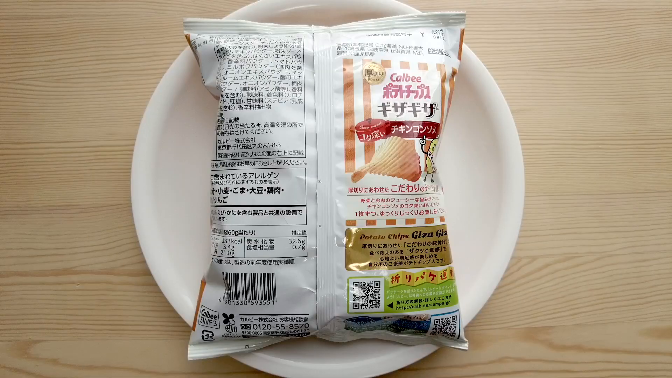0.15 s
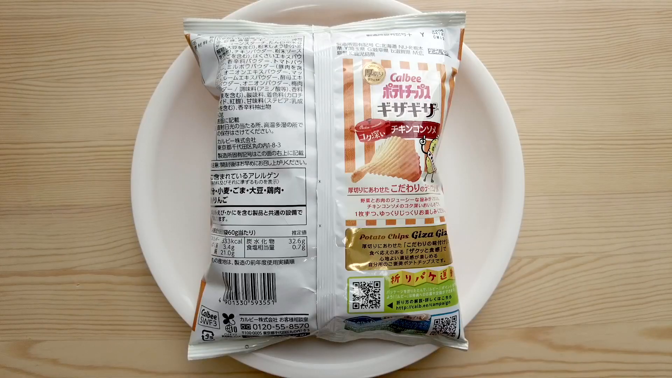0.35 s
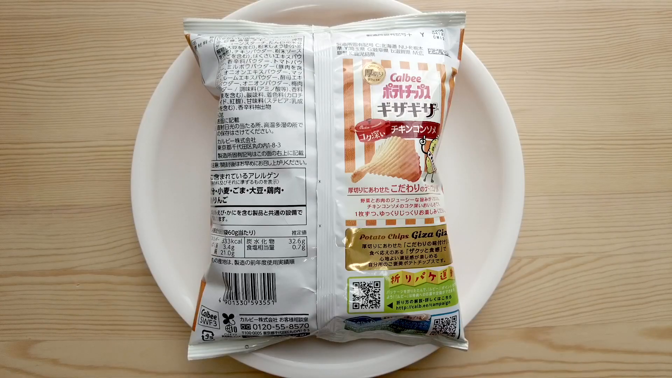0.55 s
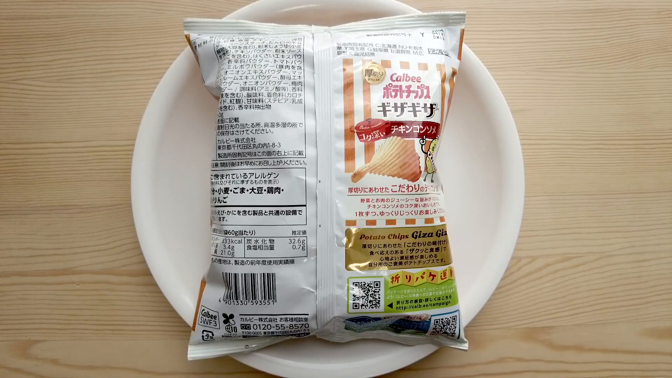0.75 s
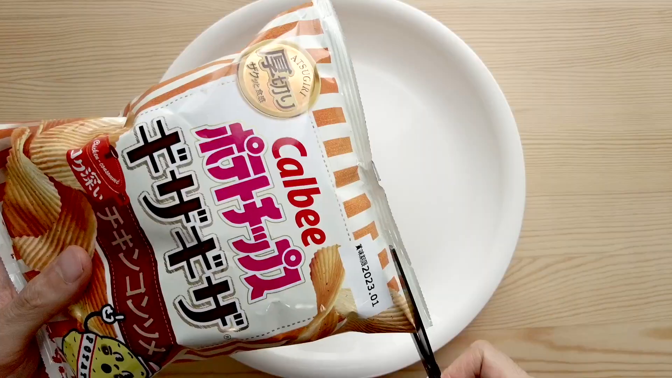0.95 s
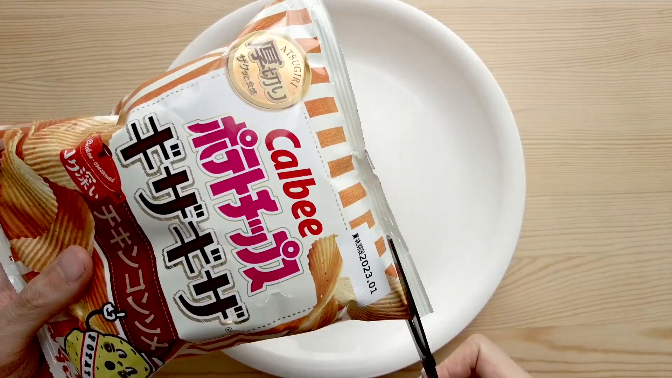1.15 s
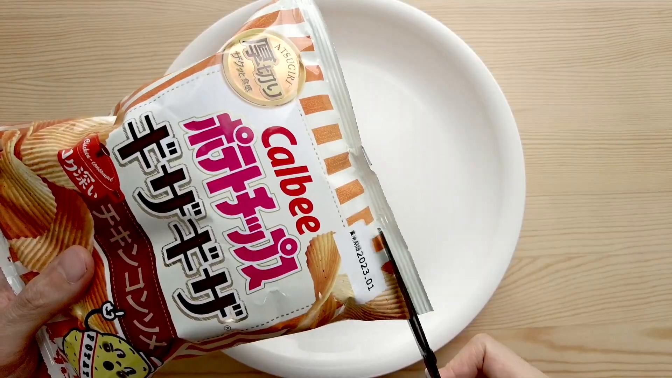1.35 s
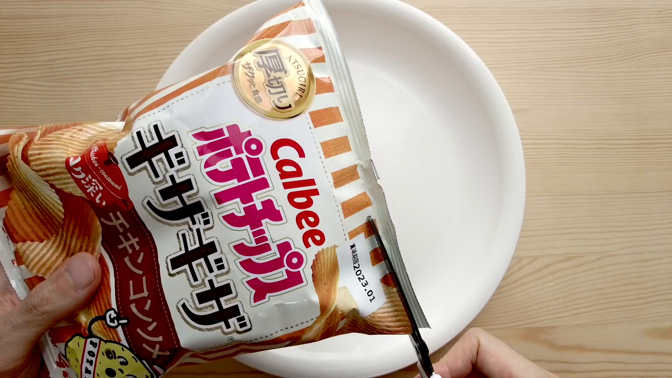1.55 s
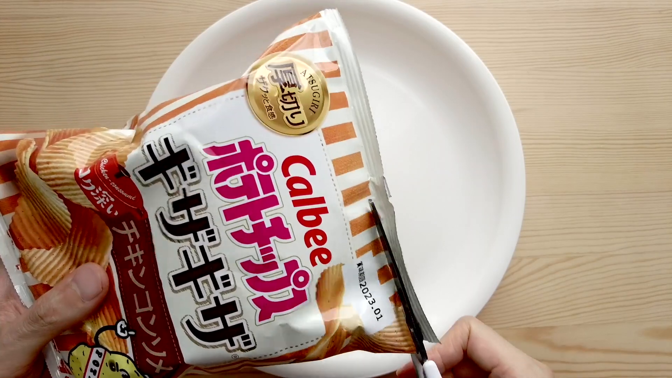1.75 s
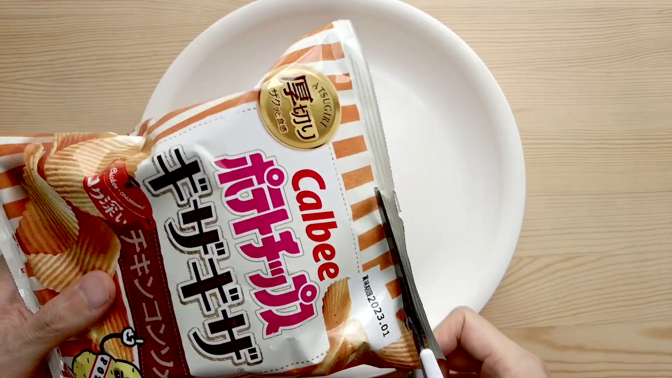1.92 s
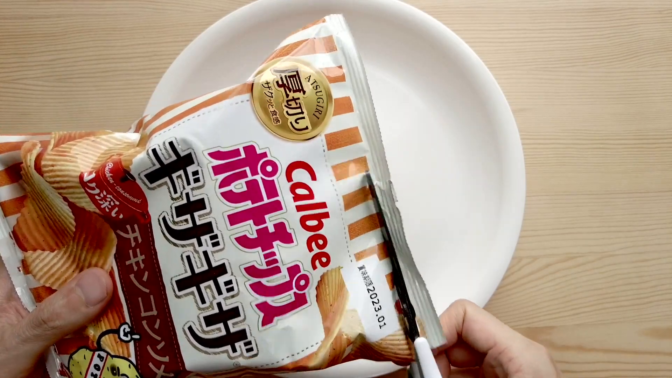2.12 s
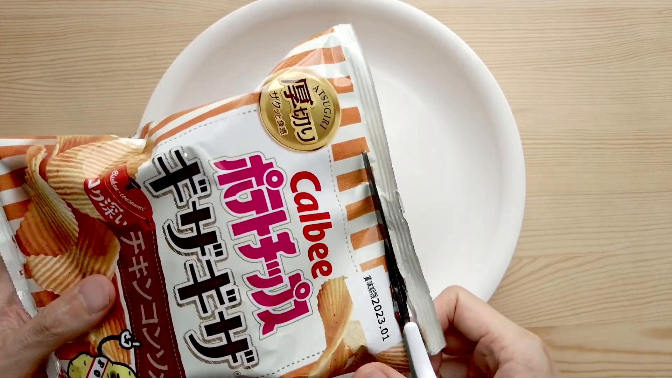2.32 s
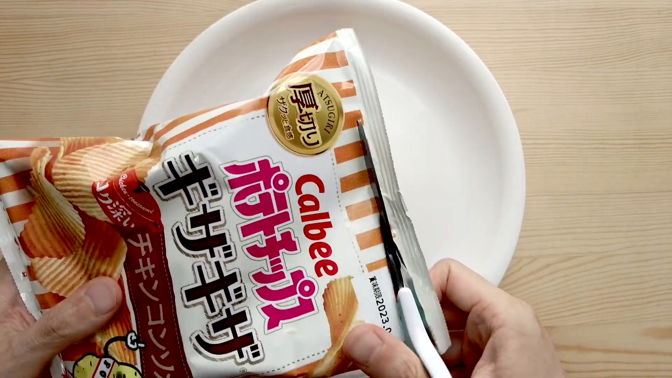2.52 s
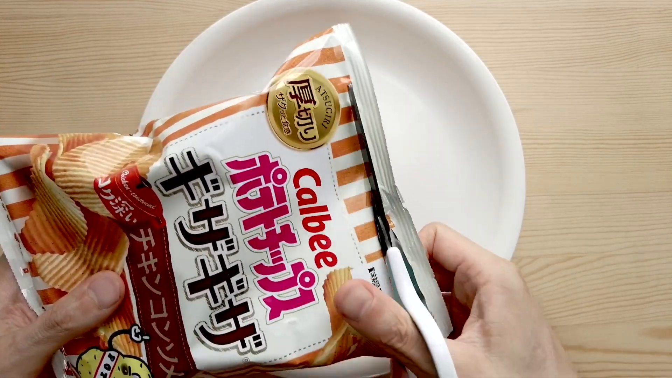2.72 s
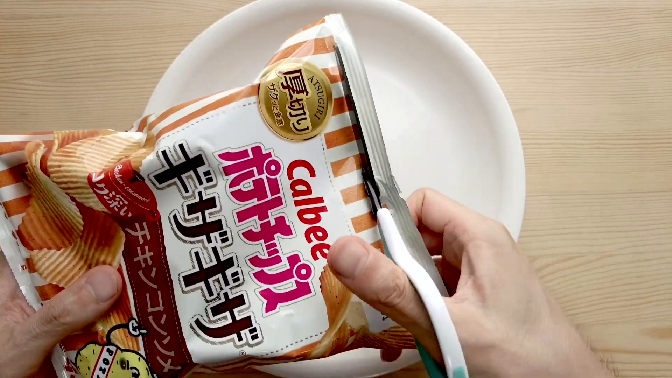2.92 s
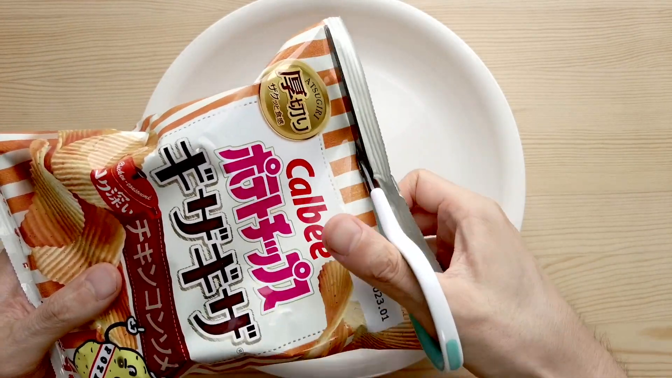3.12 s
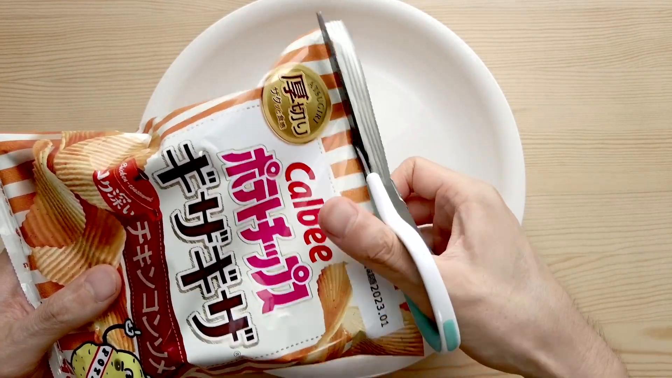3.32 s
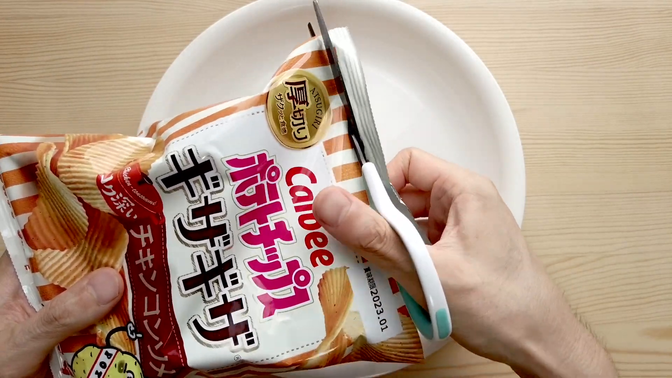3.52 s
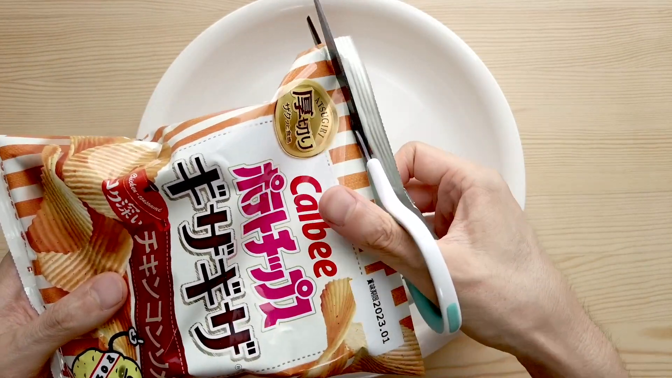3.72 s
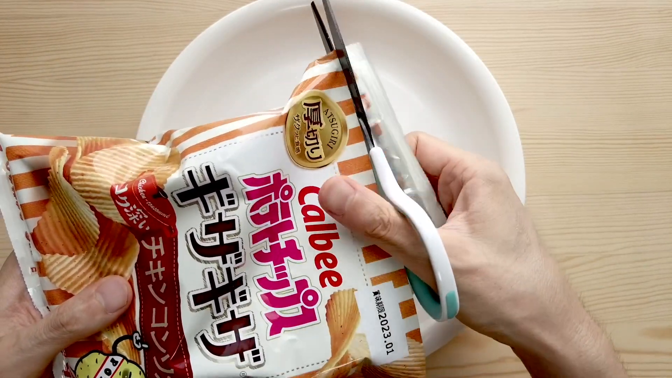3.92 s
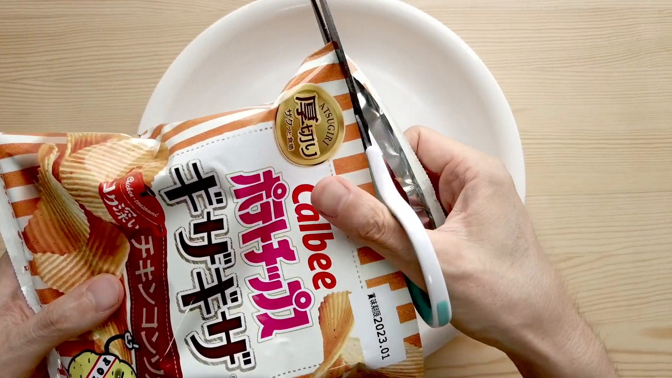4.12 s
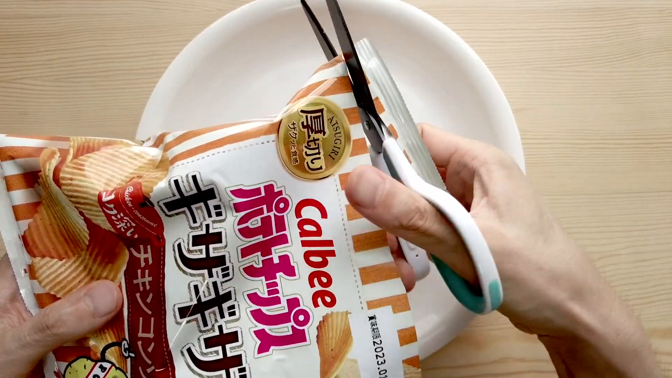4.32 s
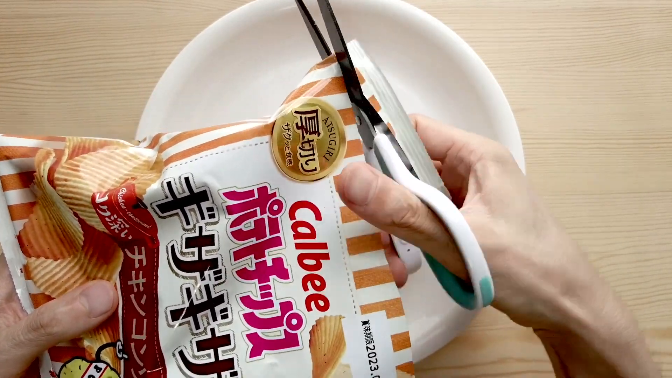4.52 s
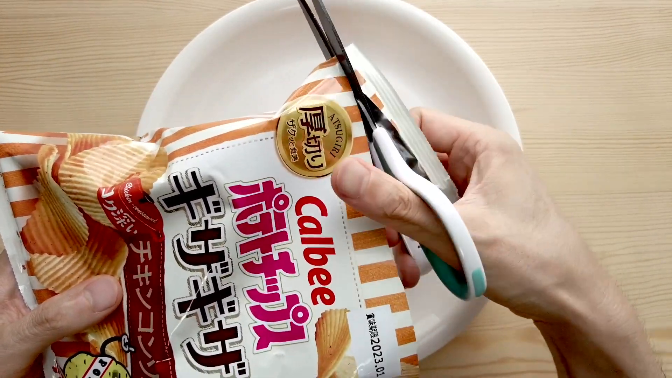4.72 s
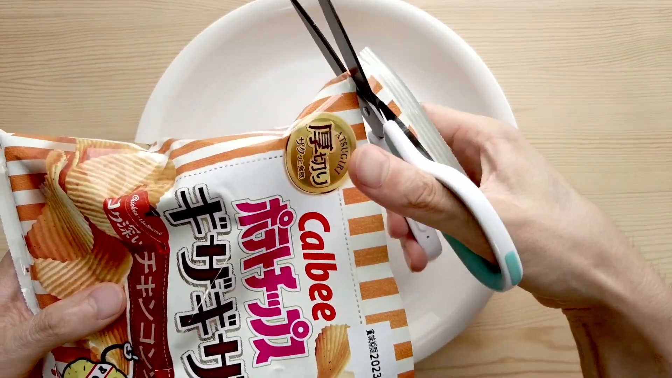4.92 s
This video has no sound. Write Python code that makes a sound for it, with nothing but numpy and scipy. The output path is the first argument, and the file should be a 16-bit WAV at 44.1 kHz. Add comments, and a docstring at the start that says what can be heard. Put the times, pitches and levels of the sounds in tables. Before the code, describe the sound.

For the first second there is almost only a quiet room: low, slightly wavering rumble under soft hiss, with barely audible foil stirrings near 1 s. At about 1.2 s scissors bite into a foil-lined snack bag and crisp crackling begins abruptly. Sharp, dry snaps ride on grainy rustle that swells and fades around eight times a second, strongest from 1.2 to 2.6 s, with prominent cracks near 1.57, 1.78 and 2.5 s. Small hollow pops of the air-filled bag and brief, faint, rising blade hisses appear between them, the hisses only until 2.8 s. From 3 to 4 s the crinkles continue regularly, somewhat lighter. After 4 s they become sparse and soft, with a clearer snap near 4.66 s and a last small crackle around 5 s. Close stereo phone microphone, bag slightly left of centre, very short faint echo.

```python
"""A quiet room hums and hisses first; then foil rustles and snaps in quick swells, about eight a second.
Scissors work along the edge of a foil-lined snack bag held over a plate, close under a phone.
Each swell of rustle is made of noise grains, the tiny creases. Single creases snap as short noise bursts
that ring the air-filled bag. Folds pop as brief pitched noise, and the sliding blades add a thin
climbing hiss. A short echo and the steady room noise lie underneath."""
import sys
import numpy as np
from scipy import signal
from scipy.fft import rfft, irfft, next_fast_len
from scipy.io import wavfile

SR = 44100
rng = np.random.default_rng(int(sys.argv[2]) if len(sys.argv) > 2 else 0)


def inscribe(sig):
    """Save sig as 16-bit PCM at rate SR to the path in sys.argv[1].

    A 1-D sig is mono; a 2-D sig holds one channel per row.
    Samples are clipped to [-1, 1] before scaling.
    """
    pcm = np.round(np.clip(np.atleast_2d(sig).T, -1, 1) * 32767)
    wavfile.write(sys.argv[1], SR, pcm.astype(np.int16))


N = 222969  # length in samples


def undb(db):
    """Turn decibels into a gain."""
    return 10 ** (np.asarray(db) / 20)


def unit(x):
    """Scale to rms 1 along time, both channels together."""
    return x / np.sqrt(np.mean(x ** 2, axis=(-2, -1), keepdims=True))


def blend(mid, side, alike):
    """Mix a common and an opposed sound into left and right; alike 1 makes both ears the same."""
    alike = np.clip(alike, 0, 1)
    ears = [np.sqrt(1 + alike) * mid + sign * np.sqrt(1 - alike) * side for sign in (1, -1)]
    return np.stack(ears, axis=-2)


def pair(shape, alike):
    """Make left and right noise with the given likeness."""
    mid, side = rng.standard_normal((2,) + shape)
    return blend(mid, side, alike)


def band(x, lo_hz, hi_hz, order=3):
    """Keep one range of pitch."""
    return signal.sosfilt(signal.butter(order, [lo_hz, hi_hz], "band", fs=SR, output="sos"), x)


def peak(hz, centre_hz, width_hz):
    """Response of one resonance: strongest at its centre, weaker to both sides."""
    return 1j * hz * width_hz / (centre_hz ** 2 - hz * hz + 1j * hz * width_hz)


# colour of the room noise, before its overall level is set: (f/Hz, level/dB for each Hz)
ROOM_COLOUR = [(12, -37), (20, -8), (43, -4), (75, -13.5), (108, -14), (169, -22), (244, -21), (281, -26),
               (521, -31.5), (616, -27.5), (772, -29.5), (1120, -32), (1300, -28), (1800, -33),
               (4050, -44.5), (15200, -57), (16500, -80)]
# how alike the room sounds at both ears: (f/Hz, likeness, 1 = the same)
ROOM_LIKENESS = [(60, .98), (130, 0.99), (290, 0.78), (640, 0.077), (1400, 0.67), (3100, 0.36),
                 (6800, 0.016)]
ROOM_DB = -56.5  # rms level of the whole room noise


def room(waver_db=3.0, waver_hz=4.6, rumble_hz=70.4):
    """Steady hiss over a rumble that wavers; the bass is nearly the same left and right."""
    size = next_fast_len(N)
    log_hz = np.log(np.arange(size // 2 + 1) * SR / size + 1)

    def along(rows):
        """Read a table at every pitch, on a log pitch scale."""
        hz, value = np.array(rows).T
        return np.interp(log_hz, np.log(hz), value)

    mid, side = rfft(rng.standard_normal((2, size)))
    ears = blend(mid, side, along(ROOM_LIKENESS))
    hush = irfft(ears * undb(along(ROOM_COLOUR)), size)[:, :N]
    waver = unit(band(rng.standard_normal((1, N)), waver_hz / 4, waver_hz, order=1))
    rumble = signal.sosfiltfilt(signal.butter(2, rumble_hz, fs=SR, output="sos"), hush)
    wavering = hush + rumble * (undb(waver_db * waver) - 1)
    return unit(wavering) * undb(ROOM_DB)


def walls(x, wet_db=-22, t60_s=0.23, gap_ms=3.5):
    """Short dull echo of table and walls: fading noise, different at each ear."""
    t = np.arange(SR // 3) / SR
    tail = band(rng.standard_normal((2, len(t))), 120, 14400)
    tail = tail * undb(-60 * t / t60_s) * (t > gap_ms / 1000)
    tail = tail / np.sqrt(np.sum(tail ** 2, axis=1, keepdims=True))
    centre = x.mean(axis=0, keepdims=True)
    return undb(wet_db) * signal.fftconvolve(centre, tail, axes=1)[:, :N]


# slides of the blades: (start t/s, end t/s, starting f/Hz, level/dB)
BLADE_SLIDES = [(1.262, 1.36, 9800, -55.5), (1.533, 1.568, 9200, -51), (1.796, 1.861, 9350, -52),
                (2.279, 2.33, 9100, -54.5), (2.736, 2.76, 8500, -60)]
SLIDE_CLIMB_HZ = 1442  # how far each slide climbs


def slides(width_hz=900, alike=.5):
    """Narrow noise whose centre climbs while the blades close."""
    out = np.zeros((2, N))
    slow = signal.butter(2, width_hz / 2, fs=SR, output="sos")
    for start, end, hz, db in BLADE_SLIDES:
        i = np.arange(int(start * SR), int(end * SR))
        centre_hz = np.linspace(hz, hz + SLIDE_CLIMB_HZ, len(i))
        turn = 2 * np.pi * np.cumsum(centre_hz) / SR
        # slow noise on a cosine and a sine gives a narrow hiss around the moving pitch
        a, b = (signal.sosfilt(slow, pair((len(i),), alike)) for _ in range(2))
        hiss = unit(a * np.cos(turn) + b * np.sin(turn))
        out[:, i] += hiss * np.sqrt(np.hanning(len(i))) * undb(db)
    return out


# hollow pops as a fold of the air-filled bag gives way: (centre t/s, f/Hz, level/dB)
FOLD_POPS = [(1.311, 195, -55), (1.406, 329, -44), (1.661, 833, -63.5), (1.785, 389, -49.5),
             (2.169, 173, -62), (2.264, 770, -48.5), (2.329, 690, -60), (2.377, 185, -61),
             (2.501, 417, -53.5), (2.77, 1060, -56.5), (3.479, 182, -59.5), (3.568, 414, -61),
             (3.961, 178.6, -61.5), (4.133, 947, -61), (4.237, 189, -62.5), (4.244, 650, -60),
             (4.733, 825, -57), (4.814, 680, -60), (5.042, 438, -57.5)]
FOLD_MS, FOLD_LAW = 21, .6  # half-length of a 200 Hz pop; higher pops are shorter by this power of pitch


def pops(width=0.69, alike=0.85):
    """Each pop is a few uneven swings round one pitch, swelling and dying."""
    out = np.zeros((2, N))
    for s, hz, db in FOLD_POPS:
        half = int(FOLD_MS * (200 / hz) ** FOLD_LAW * SR / 1000)
        centre = int(s * SR)
        i = np.arange(centre - half, min(centre + half, N))
        noise = pair((3 * half,), alike)
        # keep only the end, after the filter has had time to start
        swing = band(noise, hz * (1 - width / 2), hz * (1 + width / 2))[:, -len(i):]
        swing = swing * np.hanning(2 * half)[:len(i)]
        out[:, i] += swing / np.sqrt(np.mean(swing ** 2, axis=1, keepdims=True)) * undb(db)
    return out


# swells of rustle:
# (peak t/s, rise t/ms, fall t/ms, foil rustle level/dB, bag body minus foil level/dB)
RUSTLE_SWELLS = [(.95, 10, 13, -77.5, -8), (1.05, 13, 9.2, -77, -5), (1.24, 24, 5, -59, -20.5),
                 (1.251, 4, 130, -59, 2.5), (1.398, 5, 60, -64.5, 6), (1.537, 22, 9, -54, 4),
                 (1.559, 6, 50, -59, 8.5), (1.67, 25, 49, -62, 7.5), (1.824, 42, 39, -54.5, 1),
                 (1.916, 33, 95, -65, 1), (2.064, 47, 38, -50, 1), (2.175, 28, 46, -63, 8),
                 (2.304, 47, 28, -57.5, 4), (2.401, 32, 36, -58.5, 2.5), (2.53, 25, 32, -48, 3.5),
                 (2.651, 37, 27, -59.5, 0.5), (2.769, 35, 35, -61.5, 0.5), (2.866, 19, 43, -64, 5),
                 (2.904, 8, 29, -58.5, 3.5), (3.01, 27, 25, -64, 3), (3.101, 7, 19, -62, 2),
                 (3.132, 7.7, 22, -59, -1.5), (3.26, 28, 26, -56, 6), (3.349, 32, 48, -63.5, 3.5),
                 (3.475, 27, 22, -54.5, 3), (3.571, 21, 31, -66, -4), (3.667, 15, 31, -64, 4),
                 (3.791, 21, 22, -57, 2), (3.888, 23, 21, -55.5, 0), (3.967, 41, 13, -64, 2),
                 (4.154, 74, 21, -75, 6), (4.243, 23, 21, -65.5, 5), (4.287, 18, 22, -75.5, 16.5),
                 (4.392, 63, 82, -76, 3.5), (4.577, 42, 19, -68, 10), (4.661, 16, 28, -62.5, 2),
                 (4.794, 31, 21, -71.5, 7.5), (4.897, 23, 39, -73.5, 6), (4.983, 12, 30, -62.5, 8),
                 (5.044, 17, 18, -71.5, 11)]
# treble of the rustle as time goes on: (t/s, treble minus foil level/dB)
RUSTLE_TREBLE = [(1.2, -2), (2, -6), (2.5, -3.5), (3, -1), (3.8, -2), (4.3, -3.5), (5, -1)]
SETTLE_DB, SETTLE_MS = -17, 63  # after a swell the foil goes on settling faintly


def swells(steep=2.57):
    """Power of the rustle in body, foil and treble: it swells and fades again and again."""
    ms = np.arange(N) * 1000 / SR
    power = np.zeros((3, N))
    for s, rise_ms, fall_ms, foil_db, body_db in RUSTLE_SWELLS:
        age = ms - s * 1000
        swell = np.exp(-2 * np.abs(age / np.where(age < 0, rise_ms, fall_ms)) ** steep)
        # these curves are power, so decibels count double in undb
        settling = undb(2 * SETTLE_DB) * np.exp(-2 * np.abs(age) / SETTLE_MS) * (age > 0)
        treble_db = np.interp(s, *np.transpose(RUSTLE_TREBLE))
        level_db = foil_db + np.array([[body_db], [0], [treble_db]])
        power += np.maximum(swell, settling) * undb(2 * level_db)
    return power


# resonances of bag and plate: (f/Hz, width f/Hz, level/dB)
BAG_RESONANCES = [(228, 131, -0.5), (752, 370, 1.5), (1067, 412, 4), (1694, 990, -2), (3052, 343, 0),
                  (4820, 1680, -6), (8510, 540, -7), (9670, 1500, -10.5), (14550, 3200, -13.5)]


def ring(x, stretch=0.96, own_hz=None, own_db=0., own_width=.2):
    """Ring the bag's resonances, shifted by stretch as folds change, plus any struck panel's own pitch."""
    size = next_fast_len(x.shape[-1])
    hz = np.arange(size // 2 + 1) * SR / size
    gain = 0
    for k, (f, width, db) in enumerate(BAG_RESONANCES):
        # neighbours swing in opposite directions
        gain = gain + (-1) ** k * undb(db) * peak(hz / stretch, f, width)
    if own_hz is not None:
        gain = gain * (1 + undb(own_db) * peak(hz, own_hz, own_width * own_hz))
    return irfft(rfft(x, size) * gain, size)[..., :x.shape[-1]]


def creases(per_s, spread_db, smear_ms):
    """Loudness of a crowd of tiny creases: random moments, a few much larger than the rest; rms 1."""
    hits = (rng.random(N) < per_s / SR) * undb(spread_db * rng.exponential(size=N))
    grain = signal.lfilter([1], [1, -np.exp(-1000 / SR / smear_ms)], hits)
    return grain / np.sqrt(np.mean(grain ** 2))


# rustle bands, two each for body, foil and treble:
# (low f/Hz, high f/Hz, level/dB against the swell, left-right likeness)
FOIL_BANDS = [(114, 620, -4, 0.78), (515, 2700, 2.5, 0.79), (2392, 4200, -1, 0.52), (3820, 7660, -1, 0.21),
              (5640, 9100, -1, 0.51), (9000, 21300, 2, 0.17)]


def rustle(power, bed=1.0, shared=0.63):
    """A swelling carpet of creases; some sound in all bands, others in one, so grains differ in colour."""
    common = creases(per_s=700., spread_db=2.0, smear_ms=.9)
    out = 0
    for k, (lo, hi, db, alike) in enumerate(FOIL_BANDS):
        # duller bands come from larger folds: fewer and longer grains
        scale = (3000 / hi) ** 0.34
        own = creases(per_s=500. / scale, spread_db=2.2, smear_ms=1.5 * scale)
        grain = bed + shared * common + own
        ringing = ring(pair((N,), alike) * grain)
        out = out + unit(band(ringing, lo, hi)) * undb(db) * np.sqrt(power[k // 2])
    return out


SNAP_BODY_HZ, SNAP_MIDDLE_HZ = 980, 2210  # usual pitches where the panel's own lies in the other range
TICKS = 40  # number of small snaps left to chance
TICK_DB, TICK_SPREAD_DB = 1.5, 3  # their level over the rustle, and its scatter


def ticks(power, colour_db=2.5, crowd=.25):
    """Small snaps gather where the rustle swells, about as loud as it is, each with a colour of its own."""
    odds = np.cumsum(power[1] ** crowd)
    chance = rng.standard_normal((TICKS, 4)).T
    at = np.searchsorted(odds, odds[-1] * rng.random(TICKS))
    db = 10 * np.log10(power[1, at]) + TICK_DB + TICK_SPREAD_DB * chance[0]
    panel_hz = SNAP_MIDDLE_HZ * np.exp(0.14 * chance[3])
    return np.transpose([at / SR, db, colour_db * chance[1], colour_db * chance[2], panel_hz])


BODY_TOP_HZ, TREBLE_HZ = 1500, 5000  # borders between body, middle and treble
SNAP_DIE_MS, SNAP_DULLING = 1.74, 0.14  # basic dying time; dB longer for each dB of body over treble
SNAP_SHARPENING, SNAP_USUAL_DB = .15, -45  # dying time dB shorter for each dB above the usual level
SNAP_PUSH_DB, SNAP_PUSH_MS = 15, .035  # the first one-sided push over the burst, and its dying time
# the clear snaps: (t/s, middle level/dB, bag body minus middle level/dB,
# treble minus middle level/dB, snapping panel f/Hz)
CLEAR_SNAPS = [(1.2229, -38, 2, 1, 730), (1.2535, -35, 0, -6, 4320), (1.2595, -39, 1, -6, 1410),
               (1.3052, -55, 9, -9, 330), (1.3386, -50, 2, -6, 680), (1.3891, -54, -3, 11, 1510),
               (1.4008, -39, 3, -12, 1000), (1.5165, -43, -3, 3, 3730), (1.5274, -36, -3, 2, 1780),
               (1.536, -41, -2, 2, 3530), (1.5655, -29, -5, -4, 2000), (1.5703, -40, 0, 1, 1830),
               (1.6011, -40, 2, -2, 970), (1.6456, -57, 5, 0, 1080), (1.6809, -35, -8, -6, 2780),
               (1.6884, -47, -2, -12, 1840), (1.7205, -59, 14, -11, 600), (1.7306, -53, -9, -3, 3030),
               (1.78, -33, -5, -6, 3130), (1.8303, -49, -2, -3, 3100), (1.841, -40, -2, -8, 3060),
               (1.9009, -59, -3, 11, 3010), (1.9073, -56, 15, -10, 730), (2.0078, -53, 4, -25, 1290),
               (2.0203, -42, -7, -11, 1820), (2.032, -36, 3, -3, 1070), (2.0588, -40, -1, -2, 2910),
               (2.064, -34, -7, -9, 2840), (2.1591, -52, 0, -5, 1670), (2.242, -44, -8, -4, 1740),
               (2.2765, -52, 12, -9, 730), (2.3024, -45, -2, 3, 3180), (2.3747, -51, 5, -10, 970),
               (2.4158, -47, -3, -13, 2970), (2.5035, -31, -6, -5, 3300), (2.55, -39, -2, -5, 2290),
               (2.613, -54, 2, -2, 800), (2.6522, -38, -9, -6, 2940), (2.7273, -60, -3, 5, 4610),
               (2.7786, -46, 0, -10, 2190), (2.7847, -52, 4, 1, 3230), (2.8157, -64, -5, 3, 3030),
               (2.8632, -48, -5, 4, 4790), (2.8991, -55, 11, -14, 1130), (2.911, -42, -1, -10, 1690),
               (2.9964, -56, -13, -5, 2670), (3.0182, -36, -3, -1, 2220), (3.0971, -50, -2, 1, 4400),
               (3.1327, -42, 2, -4, 1250), (3.2422, -43, 1, -3, 1510), (3.2463, -47, 2, -1, 990),
               (3.2718, -47, 0, -6, 2620), (3.3247, -59, -2, 3, 2930), (3.4738, -39, -4, -4, 2110),
               (3.5661, -37, 3, -11, 760), (3.5875, -58, -9, 7, 4310), (3.6705, -58, 3, 4, 660),
               (3.7824, -51, -8, -4, 3060), (3.7941, -44, -4, 2, 4940), (3.8687, -52, 3, 3, 550),
               (3.9032, -55, -7, 3, 2930), (3.9603, -53, 5, -1, 750), (4.0021, -57, -8, 8, 4490),
               (4.165, -62, -17, -9, 3430), (4.2319, -56, 0, 7, 4600), (4.274, -64, -2, -3, 4020),
               (4.285, -54, -1, -22, 1650), (4.385, -69, -2, 6, 4500), (4.4116, -64, -2, -6, 3000),
               (4.4451, -65, 2, 2, 2220), (4.5098, -60, -11, -15, 1660), (4.5441, -66, 9, 6, 410),
               (4.5564, -49, -1, -17, 1540), (4.576, -53, 1, 4, 4450), (4.658, -40, -9, -2, 2760),
               (4.7715, -64, 5, -3, 1410), (4.7834, -62, 3, 2, 970), (4.9746, -51, 3, -3, 610),
               (4.985, -46, -9, -15, 2930)]
# The next five tables each list (body, middle, treble).
# left-right likeness (1 = the same)
SNAP_LIKENESS = [.85, .83, .52]
# dying time as a multiple of the snap's own
SNAP_LENGTHS = [1.7, 1.05, .7]
# flutter after the burst (level/dB)
SNAP_FLUTTER_DB = [-13, -11, -9]
# how far the snapping panel's own pitch stands out (level/dB)
PANEL_PITCH_DB = [7, 3, 3]
# delay of each range, so that body, middle and treble of a snap sound together (t/ms)
SNAP_DELAY_MS = [0, .4, .5]


def snaps(rows, tail=3.0, rise_ms=0.036, shift=0.096):
    """Each crease lets go with a spike, a burst and weaker flutter; the body rings longer than the treble."""
    s, mid_db, body_db, treble_db, panel_hz = rows.T[:, :, None, None]
    dulling_db = SNAP_DULLING * (body_db - treble_db)
    sharpening_db = SNAP_SHARPENING * (mid_db - SNAP_USUAL_DB)
    die_ms = SNAP_DIE_MS * undb(dulling_db - sharpening_db)
    size = 2048
    ms = np.arange(size) * 1000 / SR

    chance = rng.standard_normal((len(s), 3, 1, 1))
    stretch = np.exp(shift * chance[:, 0])
    low = panel_hz < BODY_TOP_HZ
    other = np.exp(0.29 * chance[:, 2])
    own_hz = [np.where(low, panel_hz, SNAP_BODY_HZ * other),
              np.where(low, SNAP_MIDDLE_HZ * other, panel_hz),
              8500 * np.exp(.3 * chance[:, 1])]
    edges = [(330, BODY_TOP_HZ), (BODY_TOP_HZ, TREBLE_HZ), (TREBLE_HZ, 17000)]

    mid, side = rng.standard_normal((2, len(s), size))
    # one push drives all three ranges
    push = np.sign(mid[:, None, :1]) * undb(SNAP_PUSH_DB) * np.exp(-ms / SNAP_PUSH_MS)
    bursts = 0
    for k, rel_db in enumerate((body_db, 0, treble_db)):
        age = ms / (SNAP_LENGTHS[k] * die_ms)
        fading = np.exp(-age) + undb(SNAP_FLUTTER_DB[k]) * np.exp(-age / tail)
        ears = blend(mid, side, SNAP_LIKENESS[k])
        noise = ears * (1 - np.exp(-ms / rise_ms)) * fading + push
        ringing = ring(noise, stretch, own_hz[k], PANEL_PITCH_DB[k], own_width=0.37)
        burst = band(ringing, *edges[k], order=3 if k else 2)
        # levels are meant over 5 ms
        energy = np.sum(burst ** 2, axis=2, keepdims=True) / (SR / 200)
        late = np.roll(burst, int(SNAP_DELAY_MS[k] * SR / 1000), axis=2)
        bursts = bursts + late / np.sqrt(energy) * undb(mid_db + rel_db)

    out = np.zeros((2, N + size))
    # start early by the treble's delay, so that the snap falls on the listed time
    starts = ((s.ravel() - SNAP_DELAY_MS[-1] / 1000) * SR).astype(int)
    for start, burst in zip(starts, bursts):
        out[:, start:start + size] += burst
    return out[:, :N]


def scene(bag_pan_db=.8):
    """Mix bag, echo and room; the bag sits a little left of centre (pan is left minus right)."""
    power = swells()
    foil = snaps(np.vstack([CLEAR_SNAPS, ticks(power)])) + rustle(power)
    bag = (foil + pops() + slides()) * undb([[bag_pan_db / 2], [-bag_pan_db / 2]])
    return bag + walls(bag) + room()


def record(dry, top_hz=16150):
    """The phone cuts the top: a steep filter removes the highest treble."""
    return signal.sosfilt(signal.ellip(8, .2, 70, top_hz, fs=SR, output="sos"), dry)


dry = scene()
out = record(dry)
inscribe(out)
```